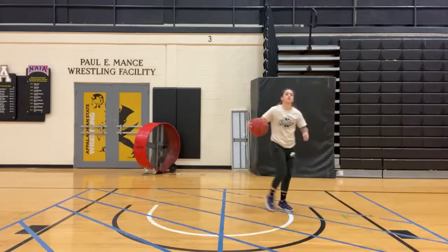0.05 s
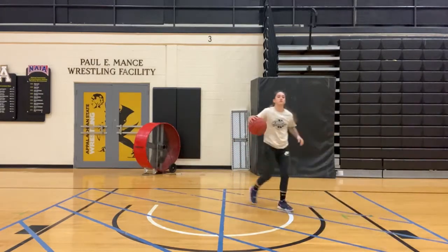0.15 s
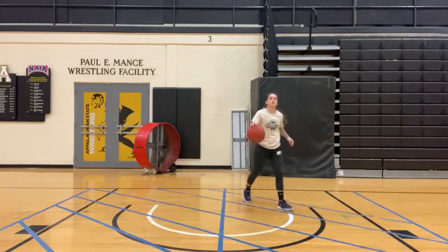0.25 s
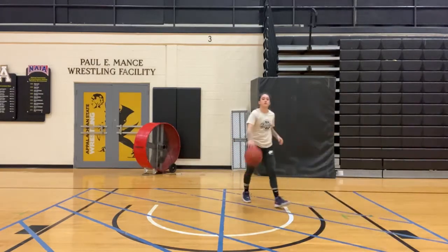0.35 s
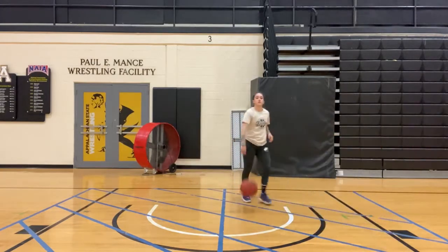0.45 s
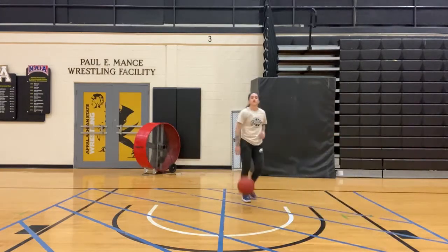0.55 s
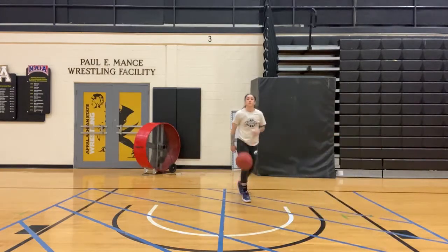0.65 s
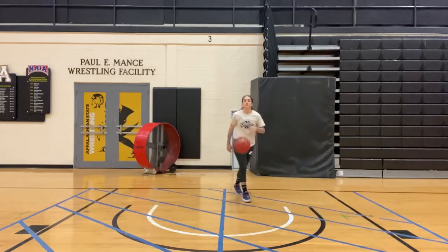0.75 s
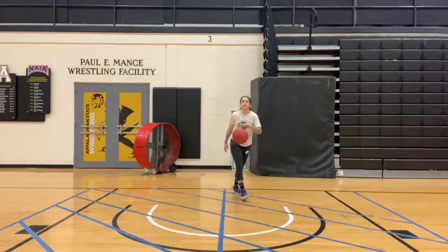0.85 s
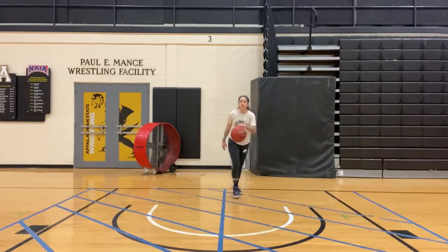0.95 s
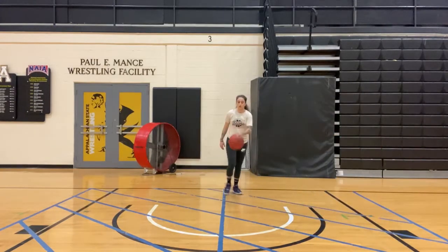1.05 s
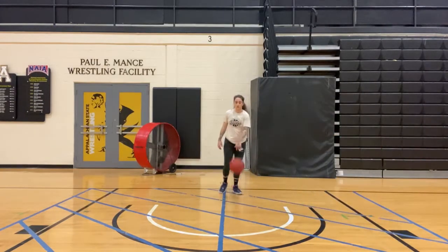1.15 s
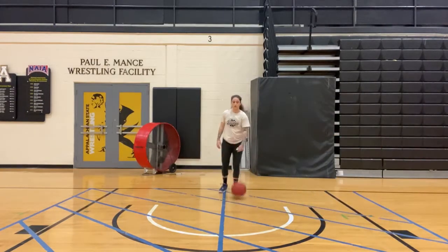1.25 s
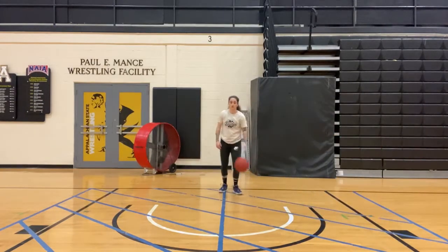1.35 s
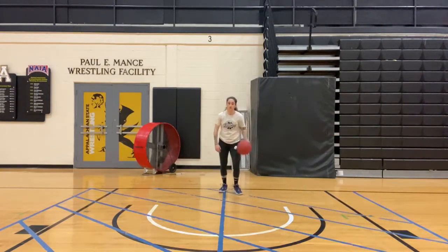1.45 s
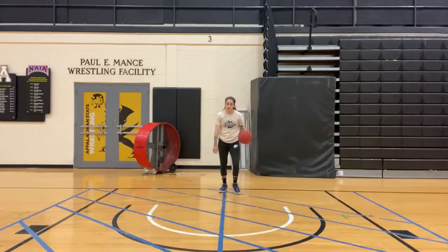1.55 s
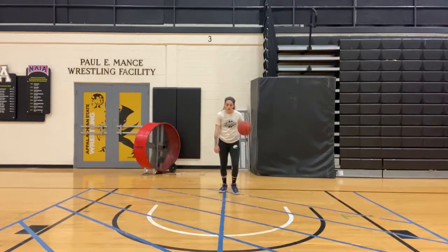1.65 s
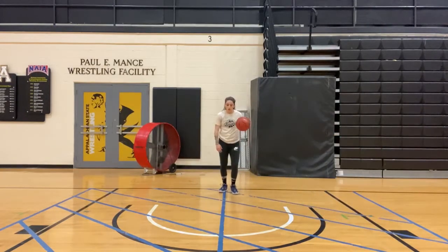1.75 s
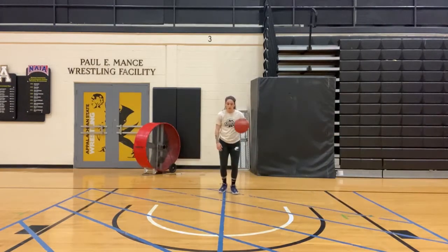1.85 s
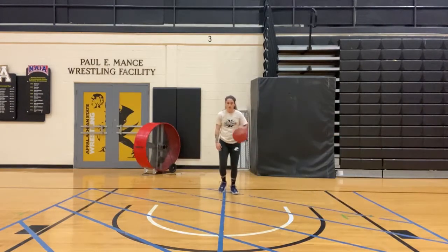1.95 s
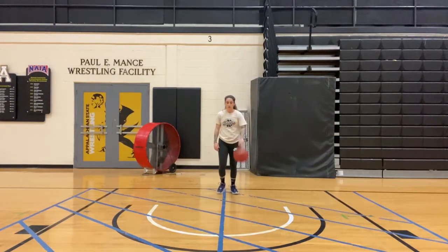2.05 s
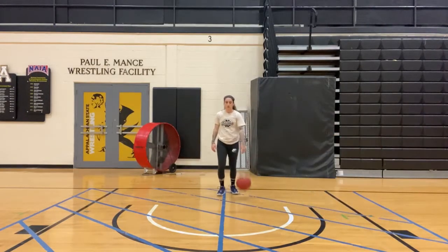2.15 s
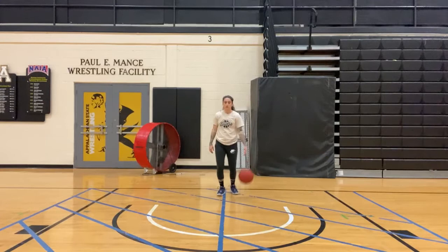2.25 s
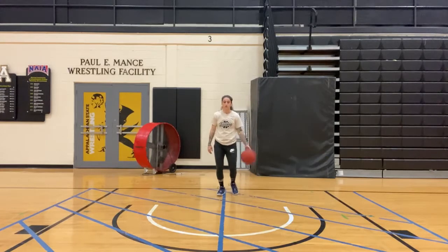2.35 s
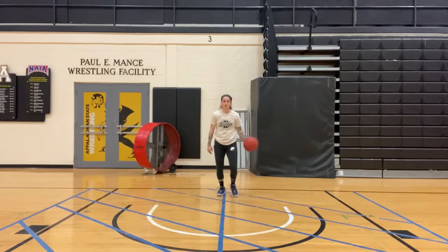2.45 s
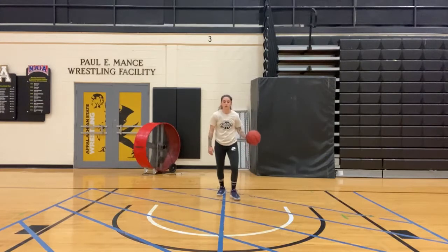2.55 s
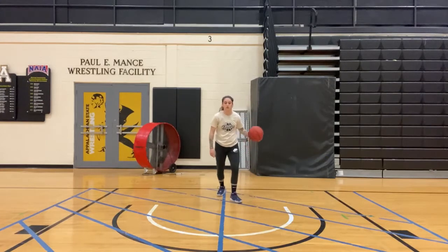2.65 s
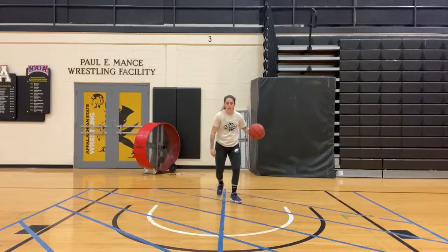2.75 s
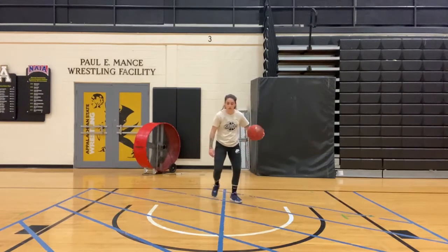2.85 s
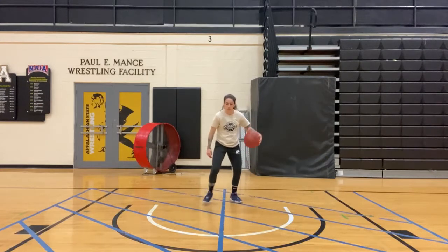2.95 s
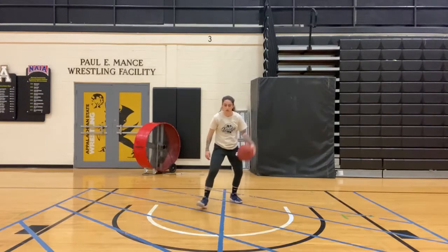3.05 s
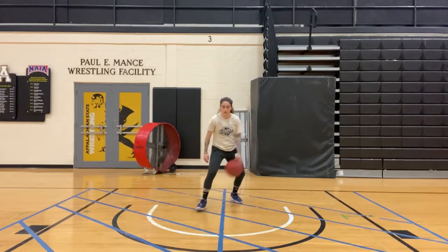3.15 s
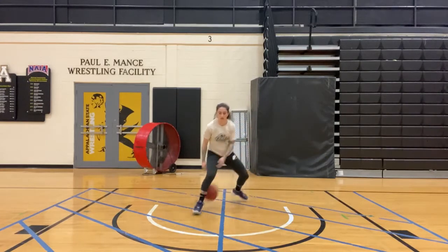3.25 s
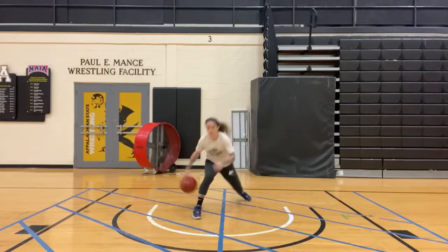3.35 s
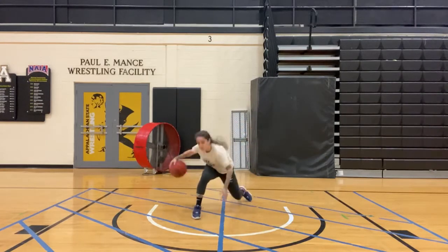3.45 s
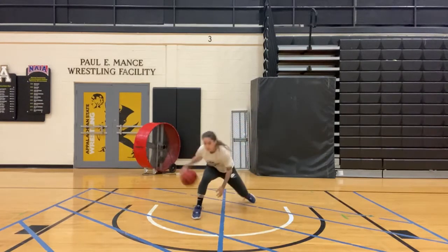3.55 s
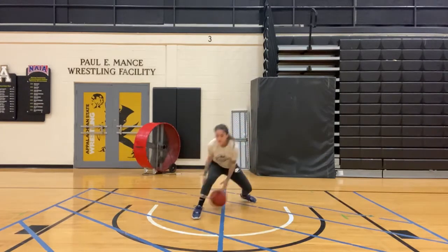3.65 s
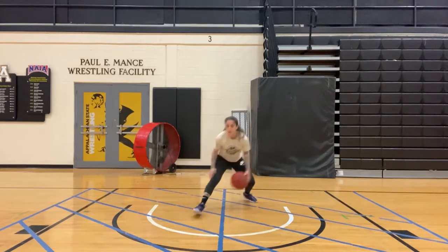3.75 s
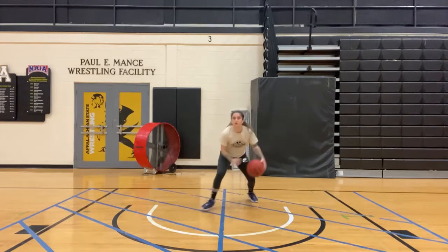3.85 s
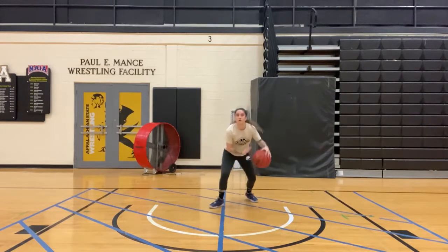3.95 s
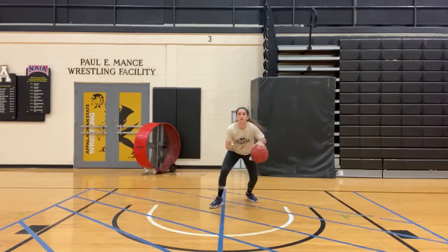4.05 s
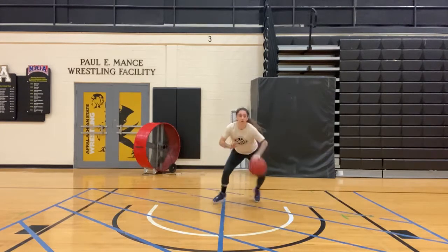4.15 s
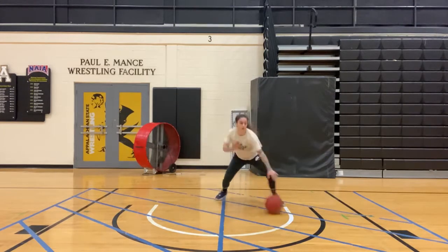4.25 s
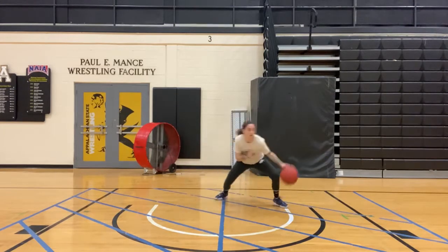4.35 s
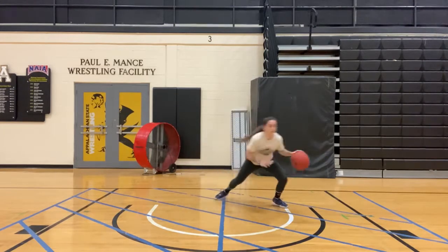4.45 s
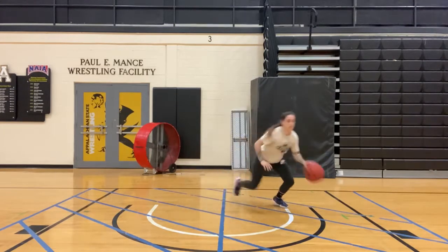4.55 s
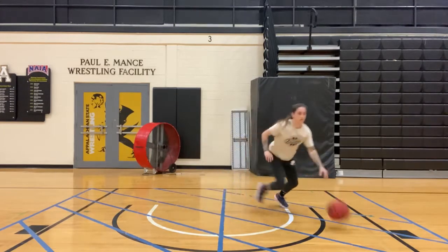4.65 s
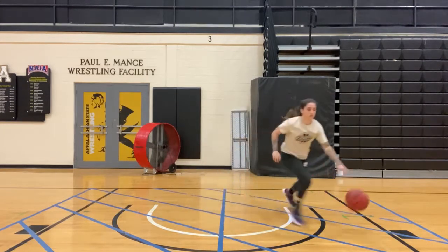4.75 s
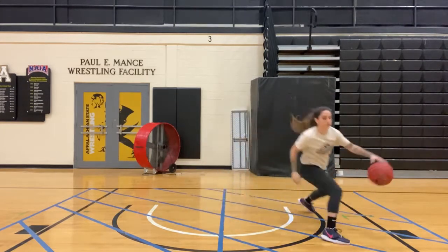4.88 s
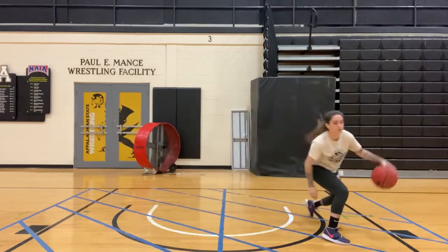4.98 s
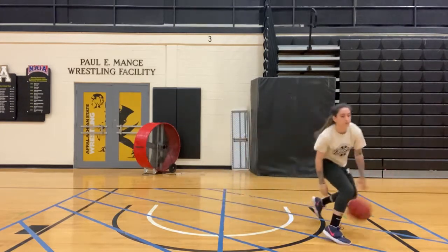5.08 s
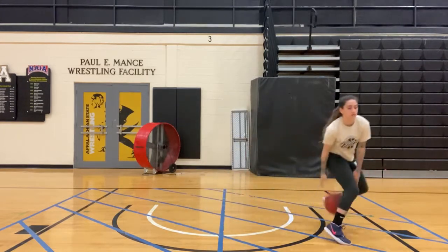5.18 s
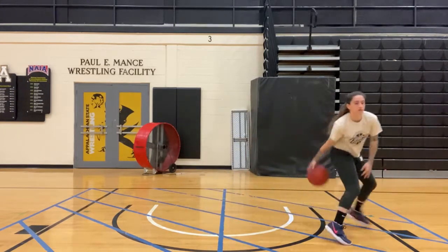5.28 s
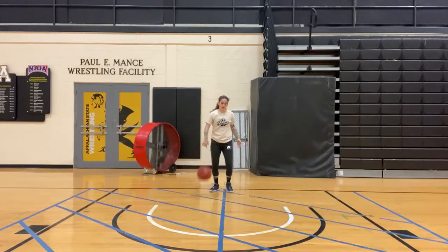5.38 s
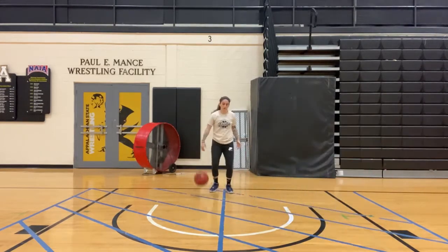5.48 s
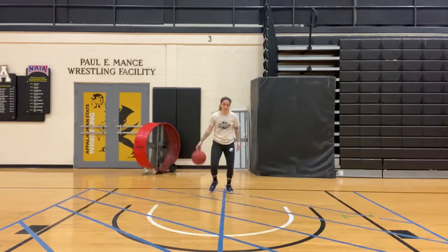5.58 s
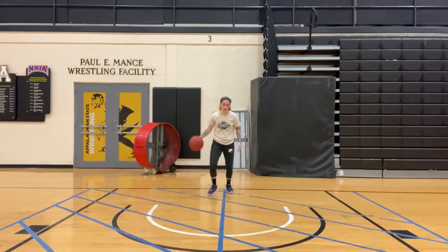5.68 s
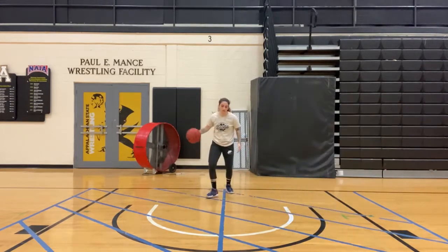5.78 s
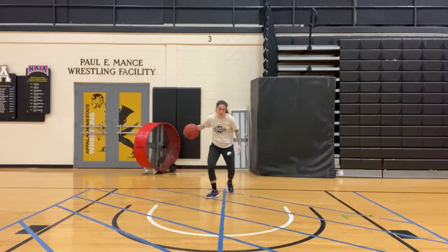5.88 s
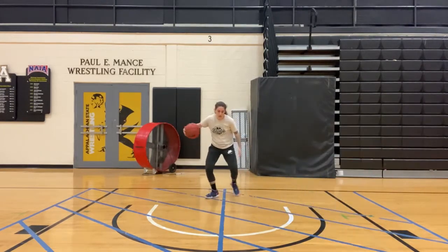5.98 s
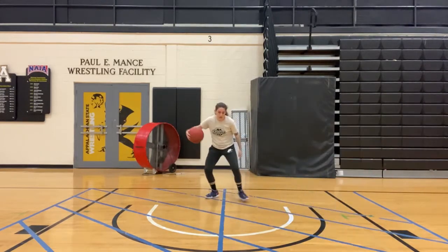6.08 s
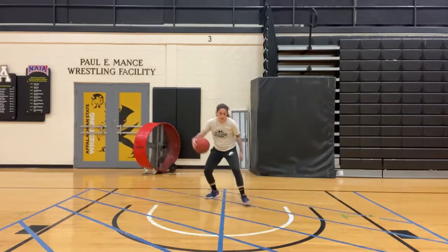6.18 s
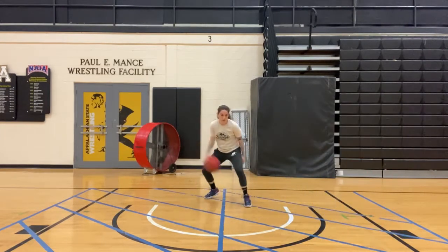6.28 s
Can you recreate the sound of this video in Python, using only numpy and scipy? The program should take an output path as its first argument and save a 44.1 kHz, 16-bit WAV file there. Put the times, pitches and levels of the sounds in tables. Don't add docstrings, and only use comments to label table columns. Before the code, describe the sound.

A basketball is dribbled on a sprung wooden gym floor, slow at first, then faster after three seconds. Each bounce slaps and thumps, with echoes from ceiling and far walls. Soles thud, with a tiny squeak at 3.35 seconds and a longer scraping one near 4.9. A microphone on the player's shirt catches rustle, ticks and low rumble over faint hiss.

```python
import sys
import numpy as np
from scipy import signal
from scipy.fft import rfft, irfft
from scipy.io import wavfile
from scipy.ndimage import uniform_filter1d

SR = 44100
rng = np.random.default_rng(int(sys.argv[2]) if len(sys.argv) > 2 else 0)


def gain_from_decibels(decibels):
    exponent = np.asarray(decibels, float) / 20
    return 10 ** exponent


def generate_wav(signal):
    frames = np.transpose(np.atleast_2d(signal))
    scaled = np.clip(frames, -1, 1) * 32767
    pcm = np.round(scaled).astype(np.int16)
    wavfile.write(sys.argv[1], SR, pcm)


N = 278712


def band(x, lo_hz, hi_hz, order=2):
    edges_hz = [lo_hz, min(hi_hz, 0.45 * SR)]
    return signal.sosfilt(signal.butter(order, edges_hz, "bandpass", fs=SR, output="sos"), x)


def unit(x):
    return x / np.sqrt(np.mean(x ** 2))


def coloured(points):
    hz, db = np.transpose(points)
    f = np.maximum(np.arange(N // 2 + 1) * SR / N, 1)
    gain = gain_from_decibels(np.interp(np.log(f), np.log(hz), db))
    return unit(irfft(rfft(rng.standard_normal(N)) * gain, N))


def walk(rate):
    hold = int(SR / rate)
    held = np.repeat(rng.standard_normal(N // hold + 1), hold)
    slewed = uniform_filter1d(uniform_filter1d(held, hold), hold)
    return unit(slewed[:N])


def ring(hz, t60, delay=0., size=8192):
    t = np.maximum(np.arange(size) / SR - delay, 0)
    return np.sin(2 * np.pi * hz * t) * gain_from_decibels(-60 * t / t60)


def burst(lo_hz, hi_hz, t60, size=8192):
    noise = unit(band(rng.standard_normal(size), lo_hz, hi_hz))
    fade = gain_from_decibels(-60 * np.arange(size) / SR / t60)
    return band(noise * fade, lo_hz / 2, hi_hz * 2, order=1)


def add(out, s, x):
    i = int(s * SR)
    out[i:i + len(x)] += x[:N - i]


def still_air():
    # frequency in Hz, level in dB per Hz.
    air_spectrum = [(35, -43.5), (60, 1), (148, 2), (240, -13.5), (600, -26), (1300, -20), (2500, -31.5),
                    (5000, -46), (9500, -54.5), (11000, -38.5), (16000, -60)]
    return coloured(air_spectrum) * gain_from_decibels(-50 + 1.4 * walk(7.9))


def high_hiss():
    # start in seconds, level in dB.
    flares = [(0.2476, -51.5), (0.5874, -58), (0.759, -52), (0.9294, -64), (1.2467, -52.5), (1.584, -54.5),
              (2.0807, -53.5), (2.2472, -47.5), (2.581, -53.5), (2.9153, -55.5), (3.4152, -52),
              (3.5803, -65), (3.9145, -49), (4.2328, -53), (4.5844, -54), (4.7494, -55), (5.233, -55),
              (5.5695, -49.5), (6.0542, -54.5)]
    out = np.zeros(N)
    for s, db in flares:
        hiss = burst(4100, 13000, 0.28) + burst(11000, 14500, 0.13)
        add(out, s, gain_from_decibels(db - 2.5) * hiss)
    return out


def gym():
    # delay in seconds, level in dB, smear (t60) in seconds, top in Hz.
    echoes = [
        (0.042, -26.5, 0.027, 9000),
        (.146, -25.5, 0.0071, 6000),
    ]
    # centre in Hz, level in dB, t60 in seconds.
    tail_bands = [(123, -27.5, 2.6), (252, -22, 0.88), (473, -29.5, 2.9), (990, -23.5, 1.57),
                  (1560, -28, 2.6), (2230, -23, 1.7), (3210, -21.5, 1.8), (4400, -27, 0.73),
                  (6500, -25, 0.73), (9500, -36, 0.39)]
    t = np.arange(int(1.6 * SR)) / SR
    slaps, tail = np.zeros((2, N))
    for s, db, smear, top_hz in echoes:
        add(slaps, s, gain_from_decibels(db - 18.5) * burst(1097, top_hz, smear))
    build = np.interp(t, [0, 0.012, 0.04, 0.14, 0.15, 0.3], [0, 0.3, 0.75, 0.45, 1.15, 1])
    for hz, db, t60 in tail_bands:
        wash = band(rng.standard_normal(len(t)), hz / 1.224, hz * 1.18)
        add(tail, 0, gain_from_decibels(db - 28.5 - 60 * t / t60) * build * wash)
    return slaps[:len(t)], tail[:len(t)]


def effort():
    # time in seconds, effort in dB.
    motion = [(0.0, -27), (0.12, -26.5), (0.3, -20), (0.42, -21), (0.79, -30.5), (1.71, -29.5),
              (1.81, -27.5), (2.15, -32.5), (2.36, -32), (2.59, -31.5), (2.75, -31.5), (3.13, -36),
              (3.33, -18), (4.65, -20.5), (4.86, -18.5), (5.03, -16.5), (5.28, -22.5), (6.32, -37)]
    return np.interp(np.arange(N) / SR, *np.transpose(motion))


def drags(column):
    # start in seconds, length in seconds, rustle in dB, rub in dB.
    slides = [(0.068, 0.19, -61.5, -35.5), (0.198, 0.056, -55, -34), (0.294, 0.1, -53, -35),
              (0.436, 0.071, -59.5, -44), (0.724, 0.081, -64, -43), (0.796, 0.19, -57, -42),
              (1.027, 0.09, -64, -53), (1.185, 0.088, -65.5, -67), (1.434, 0.17, -67, -30),
              (1.841, 0.062, -62.5, -44), (1.982, 0.11, -70, -48), (2.185, 0.039, -75, -38.5),
              (2.687, .04, -65, -38), (3.082, 0.13, -63, -45), (3.256, 0.24, -74, -47),
              (3.415, 0.12, -55, -33), (3.579, 0.056, -58, -60), (3.796, 0.23, -54, -59),
              (4.251, 0.17, -53.5, -26.5), (4.413, 0.2, -63, -39), (4.525, 0.058, -56.5, -43),
              (4.601, 0.11, -62, -25.5), (4.816, 0.17, -49, -36), (4.96, 0.061, -57, -17.5),
              (5.065, 0.051, -59.5, -30), (5.2, 0.15, -57.5, -32.5), (5.514, .035, -61.5, -42),
              (5.807, 0.14, -65.5, -50), (6.04, 0.17, -64.5, -51.5), (6.224, 0.075, -55.5, -47)]
    t = np.arange(N) / SR
    out = np.zeros(N)
    for row in slides:
        part = (t - row[0]) / row[1]
        out += gain_from_decibels(row[column]) * np.interp(part, [0, 0.17, 0.74, 1], [0, 1, 1, 0])
    return out


def rustle(effort_db):
    # frequency in Hz, level in dB.
    fibre_spectrum = [(300, -6), (800, 5.5), (2000, 3.5), (4000, -1), (7000, -3.5), (9500, -5),
                      (11000, -15.5), (14000, -12.5), (16000, -51.5)]
    grain_db = np.minimum(7.2 * rng.exponential(size=N // 128 + 1), 9)
    fibres = gain_from_decibels(grain_db).repeat(128)[:N]
    grainy = unit(coloured(fibre_spectrum) * fibres * gain_from_decibels(1.76 * walk(50))) * gain_from_decibels(6.5)
    return grainy * (gain_from_decibels(-56.5 + 0.43 * effort_db) + drags(column=2))


def ticks():
    # start in seconds, level in dB, centre in Hz.
    threads = [(0.0124, -34, 2900), (0.046, -36, 2900), (0.366, -33, 2820), (0.376, -32, 2500),
               (0.4505, -26, 4400), (0.468, -23.5, 3360), (0.494, -30, 4440), (0.7748, -23.5, 4230),
               (1.0872, -15, 4970), (1.1242, -30, 2570), (1.752, -31.5, 3080), (1.781, -28.5, 2970),
               (1.811, -35, 2950), (1.931, -34, 2650), (1.9907, -22.5, 3400), (2.004, -40, 3220),
               (2.0198, -35, 2900), (2.5496, -31, 2410), (2.191, -34, 2500), (3.1748, -28, 3080),
               (3.473, -20.5, 2470), (3.863, -14.5, 7130), (3.9484, -25, 3280), (4.186, -32.5, 2670),
               (4.333, -13.5, 2920), (4.3948, -22, 1980), (4.6346, -25.5, 3150), (4.7707, -20.5, 3250),
               (5.0738, -39, 2660), (5.6977, -26.5, 2520)]
    out = np.zeros(N)
    for s, db, hz in threads:
        snap = burst(920, 8300, 0.0041, size=2048)
        snap += 1.76 * ring(hz, 0.003, size=2048) + 0.5 * ring(870, 0.0068, size=2048)
        add(out, s, gain_from_decibels(db - 9.5) * snap)
    return out


def jolts():
    # start in seconds, level in dB, swing in Hz, push (+1) or pull (-1).
    swings = [(0.209, -7.5, 23, 1), (0.287, -10, 21, 1), (0.632, -3, 22, 1), (1.129, -13, 22.6, 1),
              (1.498, -6.5, 12.1, -1), (2.701, -10.5, 16, 1), (2.774, -5.5, 14.4, 1), (3.196, -9.5, 15, 1),
              (3.341, -1, 31, -1), (3.384, -6, 18, 1), (3.463, -1.5, 20, -1), (3.491, -1.5, 31.5, 1),
              (3.658, 0.5, 15.5, -1), (3.798, -1, 18.7, -1), (3.87, -6, 26, 1), (4.014, -6, 12.7, -1),
              (4.171, 0, 19, 1), (4.335, -2, 20, 1), (4.381, 0.5, 33.5, -1), (4.526, 0, 31, 1),
              (4.643, 2, 26.7, 1), (4.688, 3, 24.7, -1), (4.873, -3, 16, 1), (4.99, 2, 36.2, -1),
              (5.02, -6, 14, 1), (5.093, -0.5, 22, -1), (5.186, -10, 24, -1), (5.398, -12, 11.7, -1),
              (5.555, -14, 16, -1), (6.292, -16, 27, 1)]
    out = np.zeros(N)
    for s, db, hz, push in swings:
        add(out, s, np.sign(push) * gain_from_decibels(db - 5.0) * ring(hz, 0.22))
    return out


def shirt():
    effort_db = effort()
    pressure = coloured([(2, 0.0), (12, 9), (30, 3.5), (50, -8.5), (100, -48.5), (1000, -91.5)])
    rumble = pressure * gain_from_decibels(effort_db - 1.5 + 2.33 * walk(5.966))
    rub = coloured([(30, -2.0), (60, 1), (130, -7.5), (300, -18.0), (700, -26.0), (2000, -50.5), (6000, -93)])
    rub *= gain_from_decibels(-4.5 + 3.4 * walk(30))
    rub *= gain_from_decibels(-22.5 + 0.53 * effort_db) + drags(column=3)
    return rumble + rub + rustle(effort_db) + ticks() + jolts()


def steps():
    # start in seconds, level in dB, thud relative to it in dB, ring in Hz.
    landings = [(0.045, -34, -20, 326), (0.218, -31.5, -19, 238), (1.088, -33.5, -7, 404),
                (1.208, -43.5, -12, 277), (1.749, -29.5, -19, 199), (1.954, -47.5, 2, 456),
                (2.191, -36.5, -8, 200), (2.689, -36, -6, 200.4), (3.113, -59, -12, 380),
                (3.249, -47, -10, 198), (3.472, -22.5, -12, 207), (3.86, -67, -18, 288),
                (3.931, -31.5, -11, 396), (3.995, -31.5, -20, 268), (4.394, -24, -13, 202),
                (4.632, -22.5, -15, 202), (4.687, -31, 2, 202.6), (4.845, -27.5, -16, 385),
                (4.982, -26, -5, 200), (5.07, -26.5, -21, 308), (5.259, -34.5, -3, 228),
                (5.308, -35.5, -2.5, 236), (5.886, -37.5, -8.5, 199), (5.922, -40, -9.5, 221),
                (6.237, -43, -8, 376)]
    out = np.zeros(N)
    for s, db, thud_db, hz in landings:
        knock = ring(hz, 0.03) + 0.5 * burst(180, 1460, 0.027) + 0.46 * ring(520, 0.0028)
        thud = gain_from_decibels(thud_db + 11.0) * ring(71.2, 0.12)
        add(out, s, gain_from_decibels(db + 3.0) * (knock - thud))
    return out


def scrapes(rough):
    # start in seconds, end in seconds, level in dB.
    rubs = [
        (3.345, 3.376, -40.5),
        (4.866, 4.9, -50.5),
        (4.881, 4.919, -26.5),
    ]
    noise = coloured([(800, -21.5), (1800, -1.0), (3000, -11.5), (5000, 7.0), (7500, -12.5),
                      (10000, -8.0), (13000, -25), (16000, -27.0)]) * gain_from_decibels(3.0 * rough)
    out = np.zeros(N)
    for start, end, db in rubs:
        corners_s = [start - 0.002, start + 0.0025, end - 0.002, end + 0.001]
        out += noise * gain_from_decibels(db) * np.interp(np.arange(N) / SR, corners_s, [0, 1, 1, 0])
    return out


def squeaks():
    # start in seconds, length in seconds, first Hz, last Hz, level in dB.
    slips = [(3.3486, 0.0087, 5080, 4520, -11), (3.353, .021, 4720, 5650, -14),
             (3.346, 0.012, 6120, 5860, -31), (3.363, .007, 6240, 6400, -33),
             (4.838, 0.013, 6500, 6840, -44), (4.8548, 0.0053, 5970, 6050, -21),
             (4.859, .006, 5700, 5400, -19.5), (4.861, 0.013, 5760, 6200, -21.5),
             (4.867, 0.03, 6250, 5790, -26.5), (4.869, .0089, 5120, 4600, -20),
             (4.873, 0.015, 4700, 4820, -34), (4.885, 0.011, 4844, 5520, -12.5),
             (4.889, .015, 5447, 4725, -7.5), (4.897, 0.0042, 4980, 5500, -12),
             (4.898, 0.015, 4400, 4600, -21.5), (4.903, 0.0043, 5150, 5000, -4.5),
             (4.906, 0.0051, 4040, 3870, -25.5), (4.907, 0.0059, 4620, 4790, -13),
             (4.912, 0.0085, 4930, 4780, -13.5), (4.916, 0.01, 4270, 4600, -20.5),
             (4.918, 0.00395, 4870, 5040, -13.5), (4.92, 0.0067, 4940, 5220, -17)]
    out, wobble, rough = np.zeros(N), walk(900), walk(700)
    for s, length, first_hz, last_hz, db in slips:
        i, u = int(s * SR), np.linspace(0, 1, int(length * SR))
        second_squeak = s > 4
        unsteady = 1 if second_squeak else 0.3
        octave_db = -40
        if second_squeak and (first_hz + last_hz) / 2 < 4860:
            octave_db = -30 - db
        hz = (first_hz + (last_hz - first_hz) * u) * (1 + 0.028 * unsteady * wobble[i:i + len(u)])
        phase = 2 * np.pi * np.cumsum(hz) / SR
        swell = np.sin(np.pi * u ** 0.6) ** 1.47
        swell *= gain_from_decibels(db + 2 + 0.83 * unsteady * rough[i:i + len(u)])
        add(out, s, swell * (np.sin(phase) + gain_from_decibels(octave_db) * np.sin(2 * phase)))
    return out + scrapes(rough)


def ball():
    # start in seconds, slap in dB, boards and crack relative to it in dB, slap in Hz.
    bounces = [(0.57, -5.5, -13.5, -7.5, 1294), (1.315, -5, -13, -5, 1250), (2.259, -6.5, -13, -24, 1187),
               (3.339, -12, -10.5, -9, 1180), (3.694, -7.5, -6, -5.5, 1250), (4.3124, -6, -7.5, -4.5, 1246),
               (4.7321, -9, -4.5, -2.5, 1306), (5.184, -9, -7, -7.5, 1200), (5.552, -8, -13.5, -6, 1514)]
    # frequency in Hz, level in dB, t60 in seconds.
    air_modes = [(1072, -34, 0.19), (1250, -36.5, 0.052), (2200, -45.5, 0.32), (2780, -49.5, 0.5),
                 (3560, -46, .3), (4600, -52, 0.35)]
    contact_s = 0.0112
    lift_off = int(contact_s * SR)
    t = np.arange(8192) / SR
    grip = np.interp(t, [0, 0.0006, 0.0115, 0.014], [0.15, 0.82, 0.92, 0.018])
    thump = -ring(100.5, 0.1, -0.0018) * grip
    out = np.zeros(N)
    for s, db, boards_db, crack_db, hz in bounces:
        thump_db = -8 - 0.37 * db
        slap = ring(2070, 0.0047) - 1.48 * ring(hz, 0.0088, 0.0001)

        peel = ring(1.2 * hz, 0.0085, contact_s) + 0.59 * ring(0.98 * hz, 0.021, contact_s + 0.00276)
        peel *= gain_from_decibels(-12.0)
        peel += gain_from_decibels(-21.5) * np.roll(burst(330, 2660, 0.05), lift_off)
        peel += gain_from_decibels(-18) * burst(700, 2100, 0.06)

        boards = ring(472, 0.035, contact_s - 0.001) + 0.54 * ring(232, 0.079, 0.00545)
        boards += 0.5 * ring(984, 0.0087, 0.0022) + 0.72 * burst(140, 594, 0.076)

        crack = burst(1700, 7250, 0.011) + gain_from_decibels(-29) * burst(1700, 8100, 0.1)
        crack += gain_from_decibels(-15) * np.roll(burst(1500, 8000, 0.012), lift_off)

        air = np.zeros(8192)
        for mode_hz, mode_db, t60 in air_modes:
            air += gain_from_decibels(mode_db + 2.5 * rng.standard_normal()) * ring(mode_hz, t60, 0.00204)

        bounce = slap + peel + air + gain_from_decibels(thump_db + 13.0) * thump
        bounce += gain_from_decibels(boards_db + 3) * boards + gain_from_decibels(crack_db - 7) * crack
        add(out, s + 0.000994, gain_from_decibels(db) * bounce)
    return out


def scene():
    hits, soles = ball() + steps(), squeaks()
    floor = hits + soles
    before = np.arange(N) / SR < 5.367
    slaps, tail = gym()
    old_wet, new_wet = signal.fftconvolve([floor * before, floor * ~before], tail[None], axes=1)[:, :N]
    wet = np.where(before, old_wet, band(old_wet, 60, 2800, order=4)) + new_wet
    echoes = signal.fftconvolve(hits + gain_from_decibels(-9) * soles, slaps)[:N]
    far = wet + echoes + still_air()
    return (floor + far + shirt() + high_hiss())[None]


def band_limit(x):
    return signal.sosfilt(signal.butter(12, 16520, fs=SR, output="sos"), x)


def record(dry):
    rounded = np.clip(np.tanh(0.81 * dry) / 0.76, -0.99, 0.99)
    top_cut = signal.ellip(8, 0.2, 45, 15700, fs=SR, output="sos")
    return band_limit(signal.sosfilt(top_cut, rounded))


dry = scene()
out = record(dry)
generate_wav(out)
```